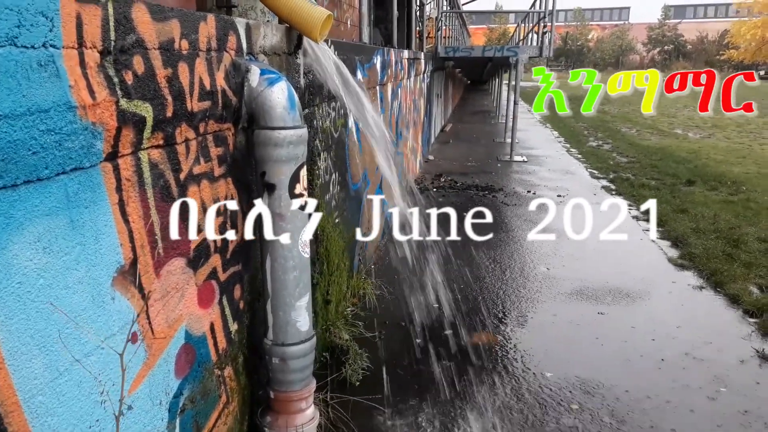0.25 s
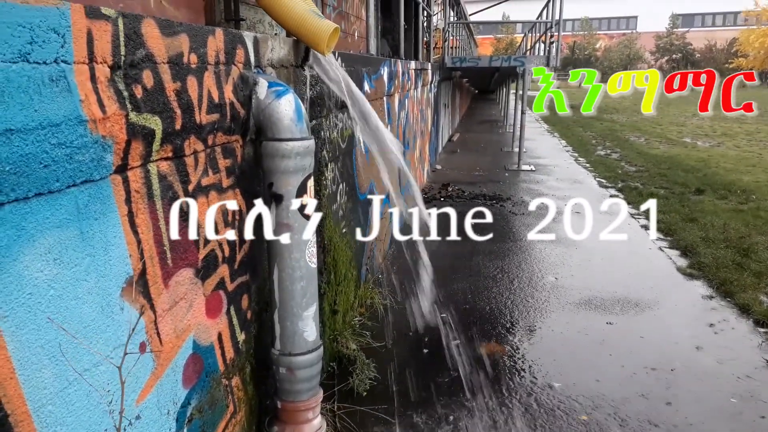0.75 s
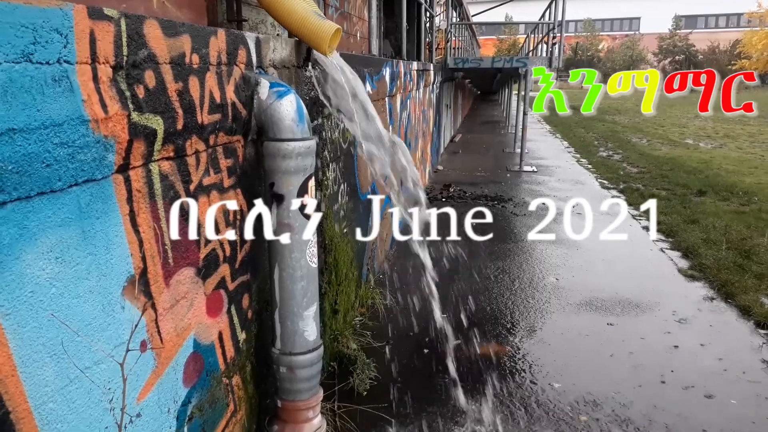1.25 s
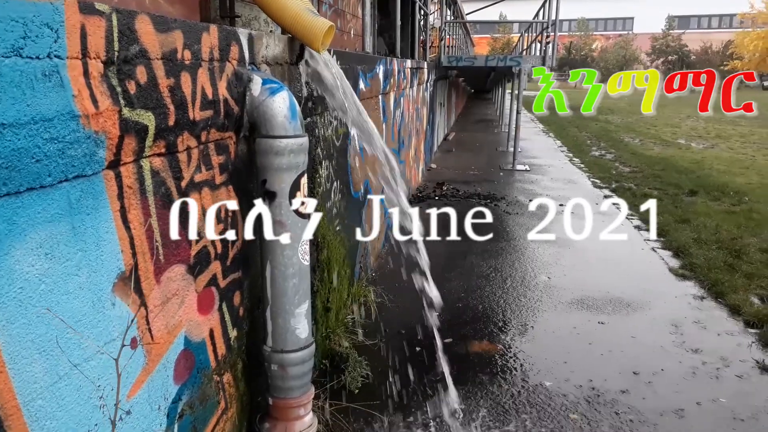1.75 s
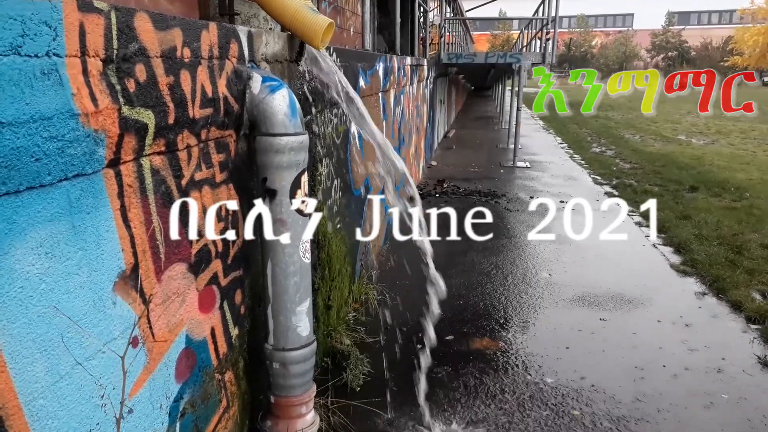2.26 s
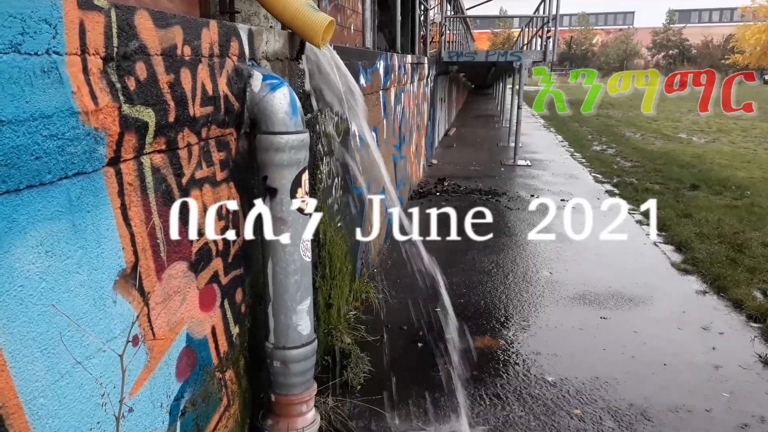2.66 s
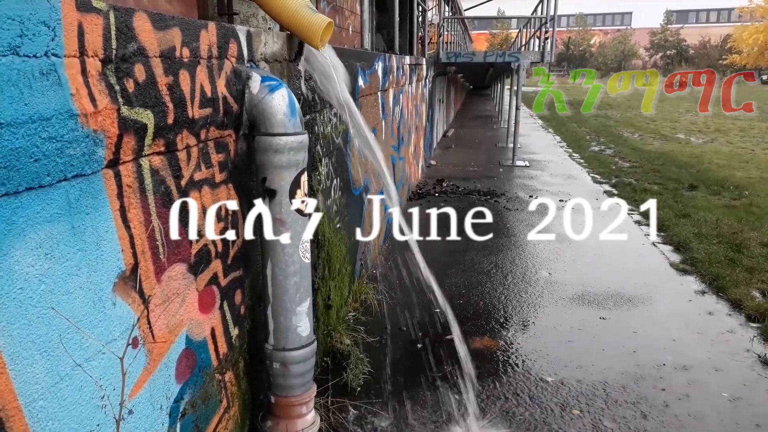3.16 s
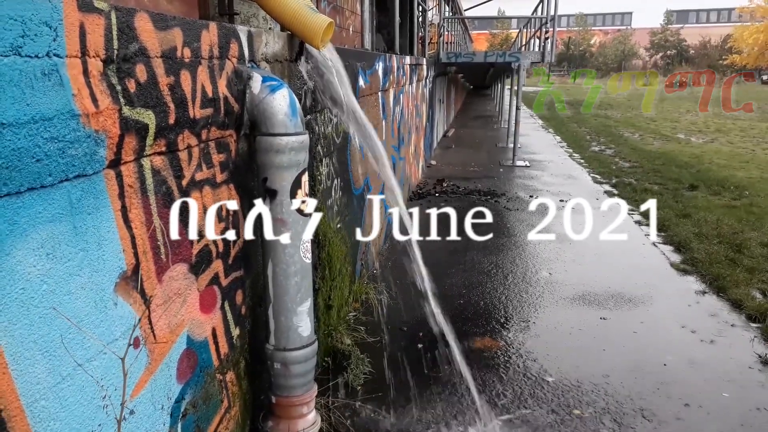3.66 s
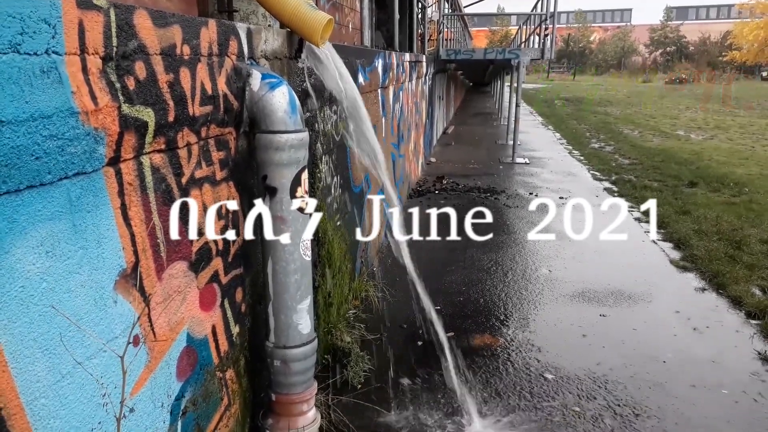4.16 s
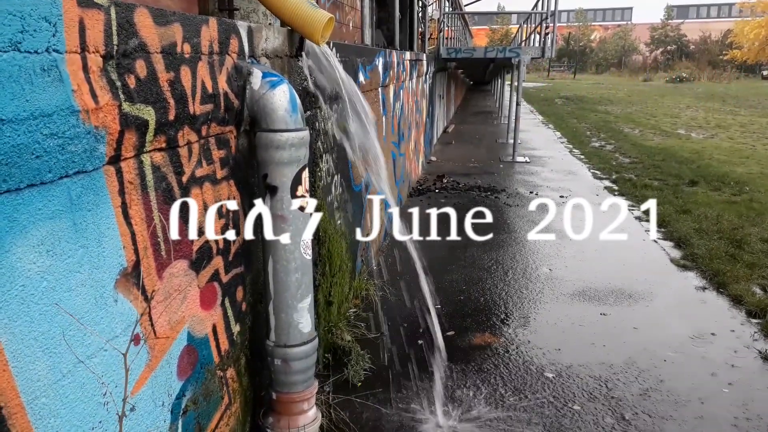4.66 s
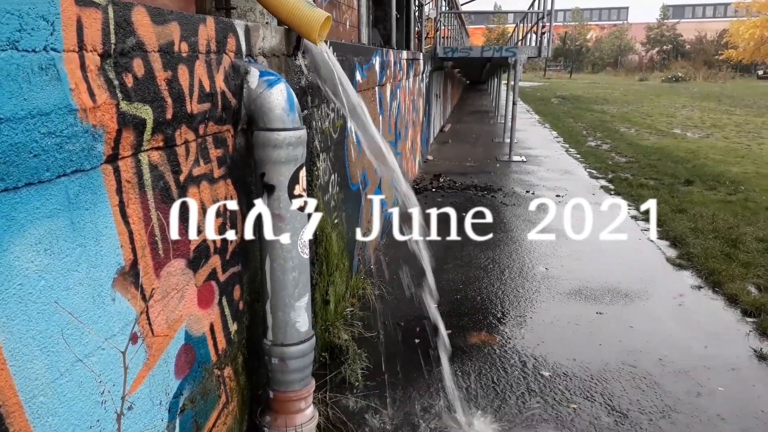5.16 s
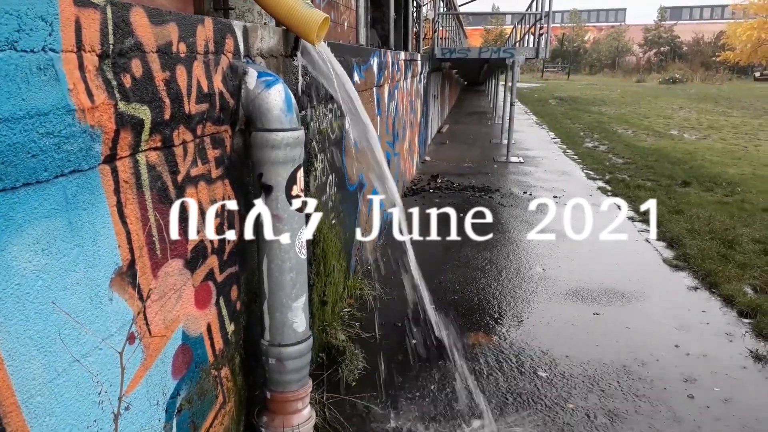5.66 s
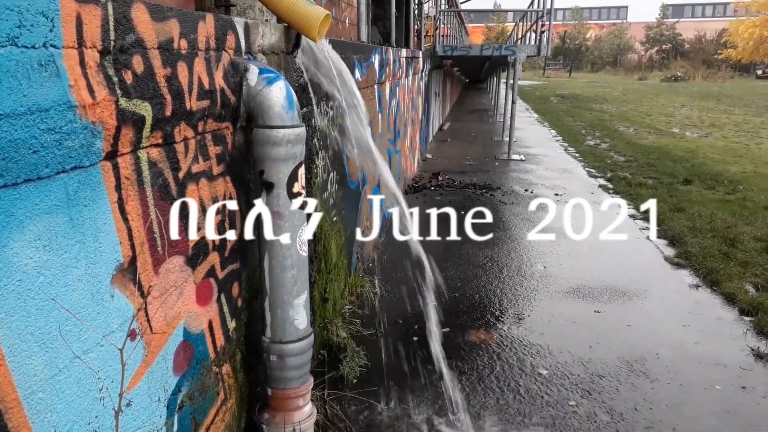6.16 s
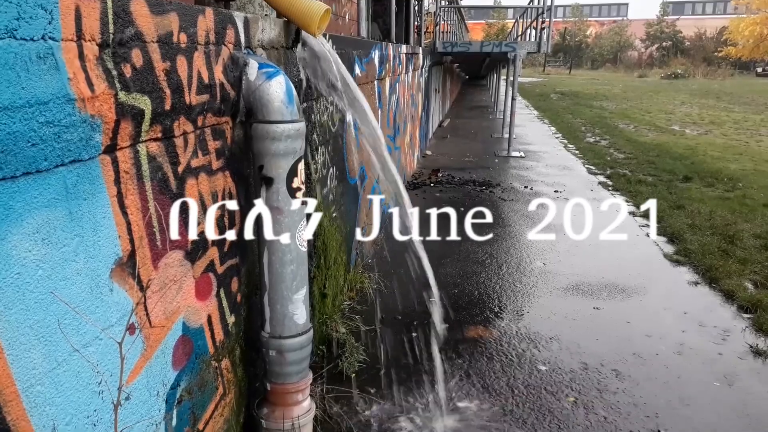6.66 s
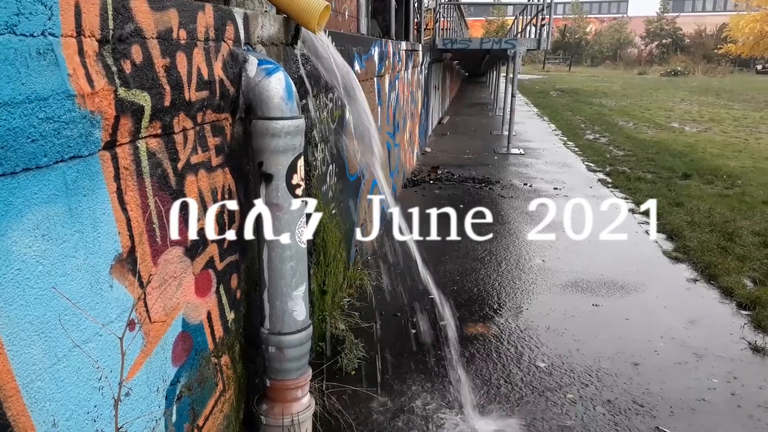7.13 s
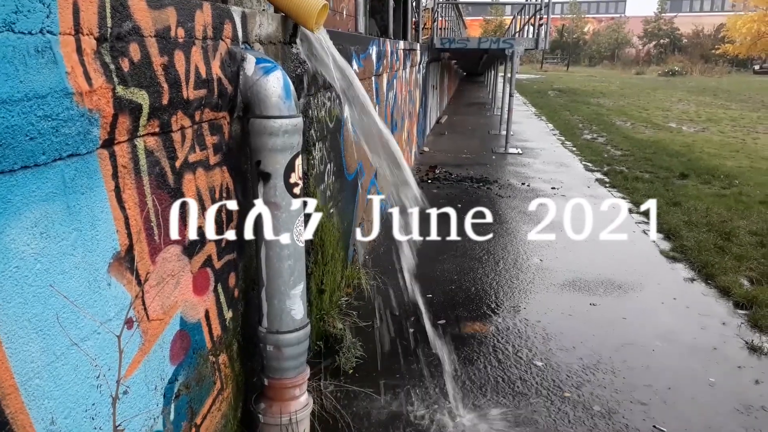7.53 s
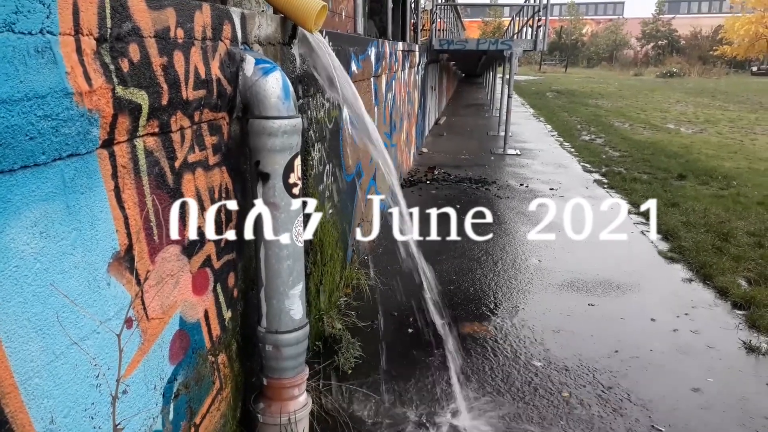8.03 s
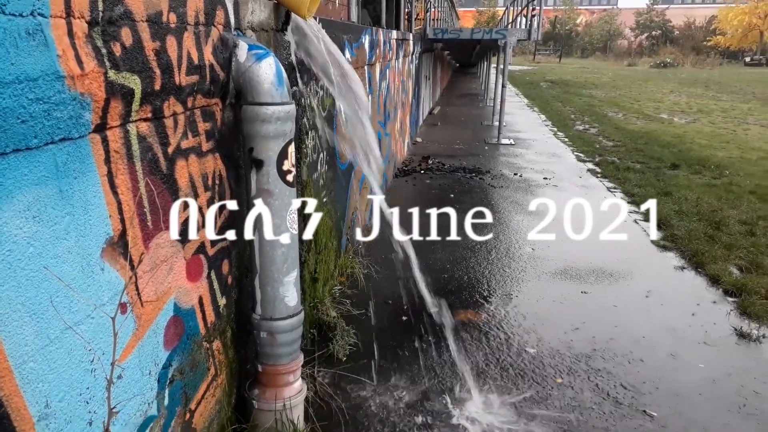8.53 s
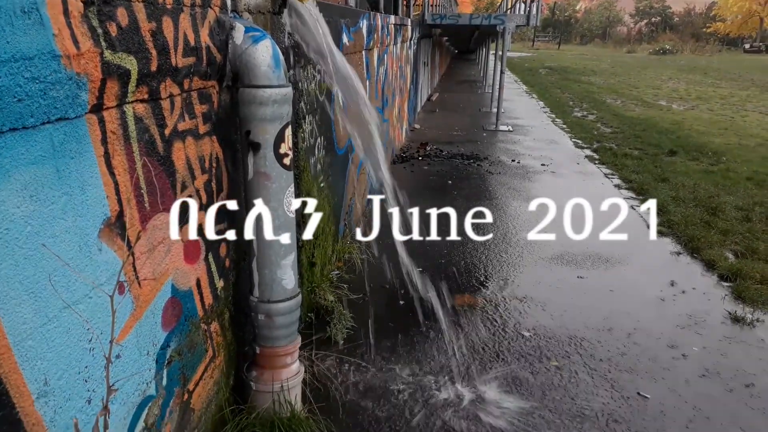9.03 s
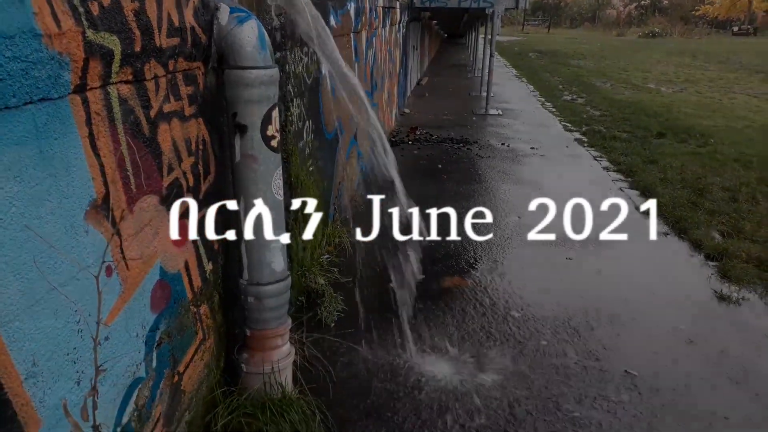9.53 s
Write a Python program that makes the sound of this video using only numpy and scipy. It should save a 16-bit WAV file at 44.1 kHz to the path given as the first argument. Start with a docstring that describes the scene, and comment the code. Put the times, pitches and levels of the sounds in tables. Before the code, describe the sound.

A thick stream from a wall pipe pounds wet pavement without pause, close and left of centre: bright, dense, crackling splatter with fine hissing spray and small bubbly plops. Low wind gusts rumble and thump on the microphone for about two and a half seconds, then only small puffs remain. Faint distant town rumble lies beneath, in an open outdoor space with very slight wall echoes.

```python
"""A loud, grainy splash, left of centre: a thick jet falls from a wall pipe onto wet pavement, outdoors. Lumps
of the jet slap the ground as decaying band noise; spray is short ticks and hiss above them. Trapped bubbles
ring as rising, dying sines; lower, heavier lumps land with a wet splat and a brief ring; a yard adds faint
noise-tail echoes. Wind, filtered noise with sharp buffets, hits the microphone for the first seconds, then in
small puffs. Under it lies a faint town rumble of coloured noise."""
import sys
import numpy as np
from scipy import signal
from scipy.fft import rfft, irfft, next_fast_len
from scipy.io import wavfile
from scipy.ndimage import uniform_filter1d

SR = 44100
rng = np.random.default_rng(int(sys.argv[2]) if len(sys.argv) > 2 else 0)


def digitize_waveform(pressure):
    """Quantize a signal to 16-bit integers and store it at the path in sys.argv[1].

    Rows of a 2-D input are taken as channels; values are limited to [-1, 1].
    """
    field = np.atleast_2d(pressure).T
    bounded = np.clip(field, -1, 1)
    quanta = np.round(bounded * 32767).astype(np.int16)
    wavfile.write(sys.argv[1], SR, quanta)


N = 431738

# flow of the jet, before band trims: t/s, 3-8 kHz splash level/dB, low splash level/dB, fine spray level/dB
JET_FLOW = [(0, -28.5, -40.0, -36.5), (0.6, -29.5, -37.5, -37.5), (1.35, -27.5, -37.5, -36.0),
            (2.4, -29.5, -37.5, -38.5), (3.4, -28.5, -36.5, -37.0), (4.4, -28.0, -36.0, -38.0),
            (5.4, -27.5, -35.5, -37.0), (5.9, -28.5, -38.5, -36.5), (6.4, -27.5, -35.0, -37.5),
            (7.3, -28.5, -36.5, -37.0), (8.2, -29.0, -36.5, -37.5), (8.9, -28.5, -37.5, -37.5),
            (9.35, -28.0, -34.5, -37.5), (9.79, -29.0, -38.0, -38.5)]
# splash spectrum, relative: f/Hz, density/dB
SPLASH_COLOUR = [(300, -34), (560, -26), (800, -20), (1130, -12.5), (1450, -18), (1950, -9.5), (2350, -6),
                 (3100, -5), (5100, -0.5), (6500, -5), (7700, -16), (8500, -17), (10600, -8), (13000, -12),
                 (15800, -12.5)]
SURGE_HZ, SURGE_DB, HEAVY_SURGE_DB = 6.1, 0.35, 0.9   # random gulps: rate, rms depth mid and low


def water():
    """Slaps, spray, bubbles and plops, swelling and thinning with the jet."""
    splash_db, heavy_db, spray_db = in_time(JET_FLOW)
    surge = drift(SURGE_HZ)
    slaps, hits = lumps(per_s=400, spread_db=4.5, decay_s=0.0021, width=0.27, broad_db=-8.5)
    mist = spray(hits, per_s=5000, spread_db=2.5, linger_s=0.013, sheet_db=4.5, fizz_db=-0.5)
    pings = bubbles(per_s=230, spread_db=12, cycles=75, rise=0.06)
    mix = slaps + from_db(2.0) * mist + from_db(-5) * pings
    patter = rms_one(colour(mix * necking(depth_db=1.5, gap_s=0.024), SPLASH_COLOUR))
    cracks = hard_slaps(decay_s=0.001, width=0.35, broad_db=-9.5, collapse_s=0.00062)
    pour = from_db(-25.5) * patter + from_db(0.5) * cracks + plops(cycles=40, splat_db=-3.5)

    # each band is levelled, then follows the flow
    body, top = butter(pour, 8000, "low", order=5), butter(pour, 8000, "high", order=5)
    low, middle = butter(body, 3000, "low", order=3), butter(body, 3000, "high", order=3)
    low_gain = from_db(heavy_db + 1.5 + HEAVY_SURGE_DB * surge)
    middle_gain = from_db(splash_db - 1.0 + SURGE_DB * surge)
    top_gain = from_db(spray_db + 1.37)
    pour = low_gain * steady(low, span_s=0.13)
    pour = pour + middle_gain * steady(middle, span_s=0.38)
    pour = pour + top_gain * steady(top, span_s=0.46)
    ears = to_the_left(pour + from_db(-16) * yard(pour, t60_s=0.17))
    return ears + stray_drops(level_db=-64.5)


def lumps(per_s, spread_db, decay_s, width, broad_db, bands=12):
    """Lumps slap the ground: big ones low, rare and longer, small ones high, frequent and short."""
    out, hits = 0, 0
    for hz in np.geomspace(1000, 7000, bands):
        # per_s / bands and decay_s hold at 3500 Hz
        landed = arrivals(per_s / bands * (hz / 3500) ** 0.64, spread_db)
        slap = burst(landed, decay_s * np.sqrt(3500 / hz))
        ringing = butter(slap, [hz / (1 + width), hz * (1 + width)], "band", order=1)
        out = out + ringing + from_db(broad_db) * slap
        hits = hits + landed
    return rms_one(out), hits


# hardest slaps, levels before band levelling: t/s, level/dB over 0.4 ms, f/Hz of band centre
HARD_SLAPS = [(0.0533, -10, 5760), (0.158, -9, 6490), (0.9882, -10, 6100), (1.0844, -11, 5060),
              (1.1947, -8, 4970), (1.2456, -7, 5450), (1.3518, -10, 5420), (1.9165, -9, 5060),
              (2.381, -6, 5730), (2.7053, -8, 4590), (3.2515, -7, 5410), (3.4216, -10, 6370),
              (4.0522, -11, 5620), (4.3375, -9, 5140), (5.4131, -10, 5720), (5.5832, -10, 4140),
              (6.2168, -7, 4650), (6.3165, -7, 4060), (6.4053, -8, 3630), (6.8788, -8, 5320),
              (6.9616, -8, 4310), (7.652, -10, 4960), (7.7358, -7, 5350), (7.9274, -11, 4550),
              (8.1718, -9, 4230), (8.4053, -11, 4870), (9.0823, -11, 4890), (9.2135, -7, 4680)]


def hard_slaps(decay_s, width, broad_db, collapse_s, size=600):
    """Heaviest lumps crack twice: on landing, and as the crater closes 0.35-2 collapse_s later."""
    lesser = by_chance(per_s=5, level_db=-10.5, spread_db=0.5, centre_hz=4600, octaves=0.6)
    rows = list(HARD_SLAPS) + lesser
    out, t = np.zeros(N), np.arange(size) / SR
    for (s, db, hz), noise in zip(rows, rng.standard_normal((len(rows), size))):
        later = t - collapse_s * rng.uniform(0.35, 2)
        landing = np.exp(-t / decay_s)
        closing = (later > 0) * np.exp(-np.abs(later) / decay_s)
        puff = noise * (landing + closing)
        crack = butter(puff, [hz / (1 + width), hz * (1 + width)], "band", order=1)
        crack = colour(crack + from_db(broad_db) * puff, SPLASH_COLOUR)
        add(out, s, as_loud_as(crack, db, span_s=0.0004))
    return out


def necking(depth_db, gap_s):
    """The jet thins just ahead of each tabled hard slap, so the patter dips before it."""
    t, thin = np.arange(N) / SR, np.zeros(N)
    for s, _, _ in HARD_SLAPS:
        ahead = slice(max(int((s - 5 * gap_s) * SR), 0), int(s * SR))
        thin[ahead] = np.maximum(thin[ahead], np.exp((t[ahead] - s) / gap_s))
    return from_db(-depth_db * thin)


def spray(hits, per_s, spread_db, linger_s, sheet_db, fizz_db):
    """Fine droplets patter; lumps spread into hissing sheets; bursts of fizz come at random."""
    droplets = arrivals(per_s, spread_db) * rng.choice([-1, 1], N)
    sheet = butter(burst(hits, linger_s), 6000, "high")
    fizz = butter(burst(arrivals(per_s=110, spread_db=1.5), decay_s=0.003), 4400, "high")
    return rms_one(rms_one(droplets) + from_db(sheet_db) * rms_one(sheet) + from_db(fizz_db) * rms_one(fizz))


def bubbles(per_s, spread_db, cycles, rise, count=7000):
    """Trapped bubbles ring briefly, rising in pitch as they near the surface; small ones are commonest."""
    out = np.zeros(N)
    for when, pitch, size, chance in rng.random((count, 4)):
        if chance < per_s * N / SR / count:
            hz = 1100 * (13000 / 1100) ** (pitch ** 0.75)
            age = np.arange(int(cycles * SR / hz)) * hz / (cycles * SR)   # 0 to 1, down 60 dB at 1
            ring = np.sin(2 * np.pi * cycles * age * (1 + rise * age))
            ping = ring * np.exp(-np.log(1000) * age)
            add(out, when * N / SR, hz * from_db(spread_db * size ** 2) * ping)
    return rms_one(out)


# biggest low, heavy slaps, levels before band levelling: t/s, level/dB over 1.6 ms, starting f/Hz
BIG_PLOPS = [(0.9318, -21, 2010), (2.4114, -20, 1750), (4.148, -25, 1890), (5.628, -20.5, 1950),
             (6.6218, -21, 2140), (7.732, -25.5, 1700), (8.54, -20.5, 1870)]


def plops(cycles, splat_db, size=1500):
    """A low, heavy lump lands in the puddle with a wet splat and a short ring, rising a little."""
    lesser = by_chance(per_s=2, level_db=-27.5, spread_db=2.5, centre_hz=2025, octaves=0.33)
    rows = list(BIG_PLOPS) + lesser
    out, t = np.zeros(N), np.arange(size) / SR
    for (s, db, hz), noise in zip(rows, rng.standard_normal((len(rows), size))):
        age = t * hz / cycles   # down 60 dB at 1
        ring = np.sin(2 * np.pi * hz * t * (1 + 0.04 * age))
        splat = from_db(splat_db) * rms_one(butter(noise, [0.6 * hz, 1.9 * hz], "band"))
        plop = (ring + splat) * np.exp(-np.log(1000) * age)
        add(out, s, as_loud_as(plop, db, span_s=0.0016))
    return out


def yard(x, t60_s, size=12000):
    """Faint scattered echoes from walls and ground: decaying noise tails, different at each ear."""
    tails = rng.standard_normal((2, size)) * np.exp(-np.log(1000) * np.arange(size) / (SR * t60_s))
    return np.array([signal.fftconvolve(x, tail / np.linalg.norm(tail))[:N] for tail in tails])


# left ear over right ear: f/Hz, level difference/dB
LEFT_OVER_RIGHT = [(1200, 5.2), (2400, 4.6), (5500, 5), (7000, 3.8), (8300, .4), (10500, 2.3), (13000, .6)]


def to_the_left(ears):
    """Tilt the balance by frequency, without any lag between the ears."""
    hz, db = np.transpose(LEFT_OVER_RIGHT)
    size = next_fast_len(N, True)
    lead_db = np.interp(np.arange(size // 2 + 1) * SR / size, hz, db)
    return irfft(rfft(ears, size) * from_db([lead_db / 2, -lead_db / 2]), size)[:, :N]


def stray_drops(level_db):
    """Thrown drops tick down on either side, different at each ear."""
    ticks = [burst(arrivals(per_s=930, spread_db=12), decay_s=0.00045) for ear in range(2)]
    return from_db(level_db) * rms_one(butter(np.array(ticks), [4000, 11000], "band"))


# wind spectrum, relative: f/Hz, density/dB
RUMBLE_COLOUR = [(20, -28), (40, -16), (65, -6), (120, 0), (190, -4), (300, -14), (500, -28), (1000, -48),
                 (3000, -70)]


def wind(lumpy_db, bright_db, apart_db, left_db):
    """Lumpy rumble on the microphone; strong gusts shift it into a brighter flutter."""
    level_db = wind_level()
    rumbles = []
    for _ in range(2):
        rumble = colour(rng.standard_normal(N), RUMBLE_COLOUR) * from_db(lumpy_db * drift(12.5))
        rumbles.append(steady(rumble, span_s=0.075))
    shared, own = rumbles
    flutter = butter(rng.standard_normal(N), [140, 290], "band") * from_db(4 * drift(40))
    flutter = steady(flutter, span_s=0.04)
    tearing = steady(butter(rng.standard_normal(N), [280, 600], "band"), span_s=0.037)

    strength = from_db(level_db + 24.5)   # 1 at a wind level of -24.5 dB
    bright = from_db(bright_db) * np.sqrt(strength)
    blend = shared + bright * flutter + from_db(-11) * strength ** 2.3 * tearing
    gust = from_db(level_db - 2.0) * blend / np.hypot(1, bright)
    gust = gust + buffets(length_s=0.00271, top_hz=650, churn_db=5.5)
    panned = gust * from_db([[left_db / 2], [-left_db / 2]])
    return panned + from_db(level_db + apart_db) * own * [[1], [-1]]


# gusts, before trim and pan: start t/s, length/s, level/dB
WIND_GUSTS = [(0.0, .48, -31.5), (0.59, 0.43, -33.5), (1.058, .19, -30), (1.311, 0.035, -31),
              (1.413, .06, -32.5), (1.565, 0.042, -31), (1.724, .05, -32.5), (1.85, 0.1, -31.5),
              (2.106, 0.17, -30.5), (2.279, 0.16, -25), (2.812, 0.054, -38), (4.795, 0.047, -38.5),
              (4.938, 0.11, -45), (7.647, .3, -45.5), (8.774, 0.036, -45)]
GUST_ATTACK_S, GUST_RELEASE_S = 0.004, 0.055   # time constants
BREEZE_DB, BREEZE_WAVER_DB = -54.5, 2   # between gusts, before trim: level, rms waver


def wind_level():
    """Each gust rises, holds and falls away; its power adds to a wavering breeze; dB."""
    t = np.arange(N) / SR
    power = from_db(BREEZE_DB + BREEZE_WAVER_DB * drift(5)) ** 2
    for s, length_s, db in WIND_GUSTS:
        rise = 1 - np.exp(-np.maximum(t - s, 0) / GUST_ATTACK_S)
        fall = np.exp(-np.clip((t - s - length_s) / GUST_RELEASE_S, 0, 20))
        power = power + (from_db(db) * rise * fall) ** 2
    return 10 * np.log10(power)


# single buffets, before pan: t/s, peak level/dB
WIND_BUFFETS = [(1.107, -18.5), (1.159, -19), (1.34, -22), (1.432, -20.5), (1.731, -20), (1.875, -15.5),
                (1.911, -15.5), (2.134, -13.5), (2.311, -13.5), (2.346, -15), (2.383, -16.5),
                (2.418, -15.5), (4.838, -26.5), (5.064, -32.5), (6.068, -34), (6.271, -28), (7.662, -30.5),
                (8.514, -28.5)]


def buffets(length_s, top_hz, churn_db):
    """Eddies hit the microphone: push and pull, then a short churn; the harder, the quicker and brighter."""
    out = np.zeros(N)
    for s, peak_db in WIND_BUFFETS:
        speed = from_db(peak_db / 2) * 2
        age = np.arange(int(SR / 10)) * speed / (length_s * SR)
        push = -np.sign(age - 1) * np.exp(-3 * np.abs(age - 1))
        churn = from_db(churn_db) * rng.standard_normal(len(age)) * age * np.exp(-age)
        thump = butter(push + churn, [80, 110 + top_hz * speed ** 2], "band")
        add(out, s, from_db(peak_db) * thump / np.abs(thump).max())
    return out


# town spectrum, relative: f/Hz, density/dB
TOWN_COLOUR = [(20, -20), (60, 4), (110, 2.5), (220, -0.5), (320, -2.5), (410, -6.5), (600, -1.5),
               (2000, -2.5), (8000, -73)]


def town(level_db, apart_db):
    """Far traffic, a smooth low rumble: steady coloured noise, partly different at each ear."""
    mid, side = [rms_one(colour(rng.standard_normal(N), TOWN_COLOUR)) for _ in range(2)]
    return from_db(level_db) * (mid * from_db([[1.5], [-1.5]]) + from_db(apart_db) * side * [[1], [-1]])


def arrivals(per_s, spread_db):
    """Random instants, each with a size of its own."""
    return (rng.random(N) < per_s / SR) * from_db(spread_db * np.clip(rng.standard_normal(N), -2, 2))


def by_chance(per_s, level_db, spread_db, centre_hz, octaves, count=200):
    """Rows (t/s, level/dB, f/Hz) for lesser events at random moments."""
    rows = []
    for when, size, pitch, chance in rng.random((count, 4)):
        if chance < per_s * N / SR / count:
            db = level_db + spread_db * (2 * size - 1)
            hz = centre_hz * 2 ** (octaves * (pitch - 0.5))
            rows.append((when * N / SR, db, hz))
    return rows


def burst(hits, decay_s):
    """Each hit sets off a puff of noise that dies away; energies add."""
    energy = signal.lfilter([1], [1, -np.exp(-2 / (decay_s * SR))], hits ** 2 + 1e-18)
    return np.sqrt(energy) * rng.standard_normal(N)


def drift(pole_hz):
    """Slow random wander, rms 1: noise through a two-pole low-pass, at 1/20 of the sample rate."""
    r = np.exp(-40 * np.pi * pole_hz / SR)
    noise = rng.standard_normal(N // 20 + 4002)
    slow = signal.lfilter([1], [1, -2 * r, r * r], noise)[4000:]   # settled part
    return np.interp(np.arange(N) / 20, np.arange(len(slow)), rms_one(slow))


def colour(x, spectrum, size=4096):
    """Causal minimum-phase filter that follows a spectrum, via the folded cepstrum."""
    hz, db = np.transpose(spectrum)
    grid = np.maximum(np.arange(size // 2 + 1) * SR / size, 1)
    cepstrum = irfft(np.log(from_db(np.interp(np.log(grid), np.log(hz), db))))
    cepstrum[1:size // 2] *= 2
    response = irfft(np.exp(rfft(cepstrum[:size // 2], size)))
    return signal.fftconvolve(x, response)[:N]


def butter(x, hz, kind, order=2):
    """Butterworth filter."""
    sos = signal.butter(order, np.clip(hz, 10, 0.45 * SR), kind, fs=SR, output="sos")
    return signal.sosfilt(sos, x + 1e-18)


def steady(x, span_s):
    """Even out the level over a span of time, keeping the grain; rms near 1."""
    size = int(span_s * SR) + 1
    power = uniform_filter1d(uniform_filter1d(x ** 2, size), size)
    return x / np.sqrt(power + 1e-9)


def as_loud_as(sound, db, span_s):
    """Give a short sound the energy of a level held for a span of time."""
    return from_db(db) * sound * np.sqrt(span_s * SR / np.sum(sound ** 2))


def add(out, s, sound):
    """Mix a sound in at a time in seconds."""
    at = int(np.clip(s * SR, 0, N - 1))
    out[at:at + len(sound)] += sound[:N - at]


def in_time(rows):
    """Each column of a curve, interpolated at every sample."""
    s, *columns = np.transpose(rows)
    return [np.interp(np.arange(N) / SR, s, c) for c in columns]


def rms_one(x):
    """Scale to rms 1."""
    return x / np.sqrt(np.mean(x ** 2) + 1e-20)


def from_db(db):
    """Decibels to amplitude gain."""
    return 10 ** (np.asarray(db) / 20)


def scene():
    """The splash to the left, with wind and town around it."""
    gusty = wind(lumpy_db=5.0, bright_db=-6.5, apart_db=-17.0, left_db=4.5)
    return water() + gusty + town(level_db=-45.5, apart_db=-17.0)


def record(dry):
    """Steep elliptic low-pass: the top is cut above 15.85 kHz."""
    sos = signal.ellip(12, 0.1, 80, 15850, fs=SR, output="sos")   # ripple 0.1 dB, stop band -80 dB
    return signal.sosfilt(sos, dry)


dry = scene()
out = record(dry)
digitize_waveform(out)
```